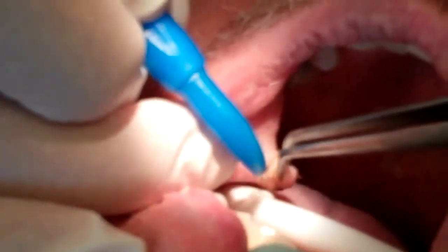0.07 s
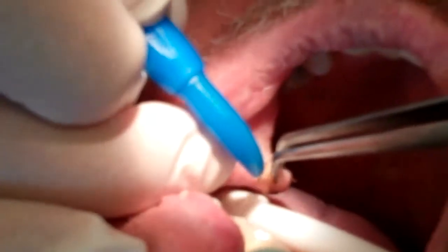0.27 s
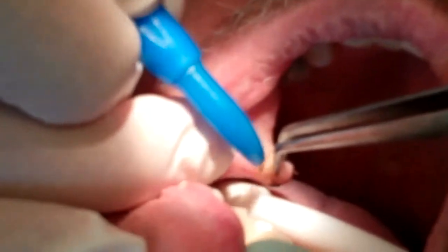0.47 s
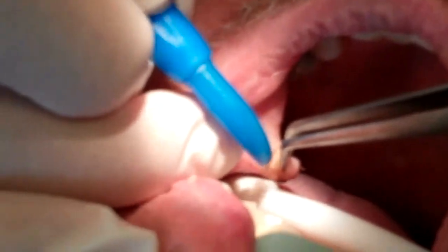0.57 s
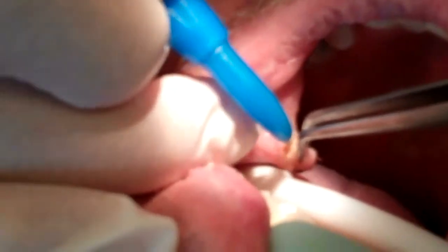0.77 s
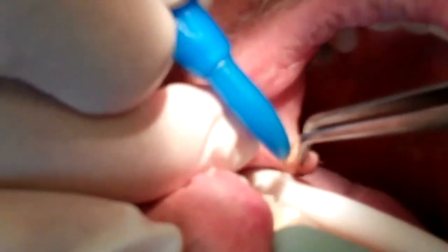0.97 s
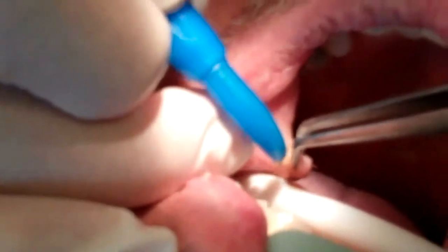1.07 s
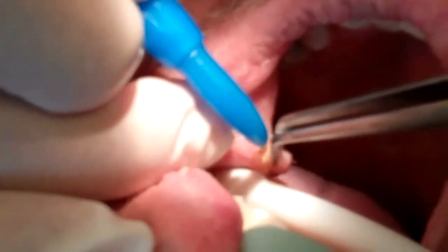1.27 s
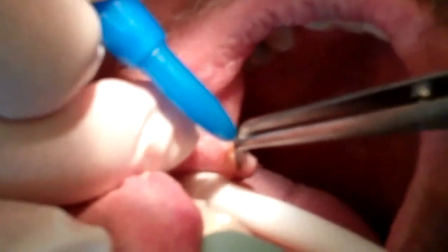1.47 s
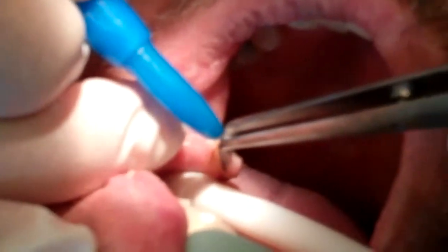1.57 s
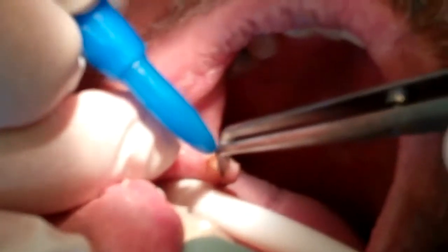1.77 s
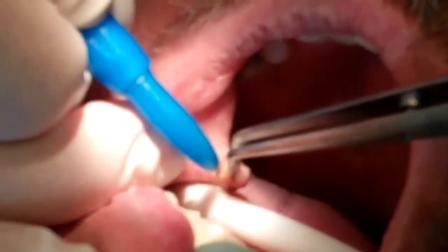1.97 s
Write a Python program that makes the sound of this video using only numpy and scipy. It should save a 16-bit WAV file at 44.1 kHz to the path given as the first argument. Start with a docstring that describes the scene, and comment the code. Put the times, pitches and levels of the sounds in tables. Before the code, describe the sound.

Dental suction hisses steadily for the full 2 seconds, close and bright, with resonant, tube-like high tones and only slight flutter. A thin airy whistle sags in pitch until 0.25 s, rises and stands out around 0.4-0.55 s, dips near 0.9 s, then fades after 1 s. Beneath, a very faint low hum wavers and swells unevenly over quiet treatment-room rumble.

```python
"""Dental suction in an open mouth

A suction tip draws air steadily, close to the microphone: stereo noise hisses through fixed
resonances of the tip and the mouth. One narrow, airy whistle, made of noise around a gliding pitch,
wanders as the tip shifts against the gum. Underneath, a faint low hum made of two sines wavers
in pitch and level, and filtered noise gives the quiet rumble of the treatment room."""
import sys
import numpy as np
from scipy.fft import rfft, irfft
from scipy.io import wavfile

SR = 44100
rng = np.random.default_rng(int(sys.argv[2]) if len(sys.argv) > 2 else 0)


def wav_record(signal):
    """Record a signal, one row per channel, as 16-bit PCM in the file named by sys.argv[1]."""
    frames = np.transpose(np.atleast_2d(signal))
    bounded = np.clip(frames, -1, 1)
    # unit amplitude maps onto the largest positive 16-bit level
    quanta = np.round(bounded * 32767).astype(np.int16)
    wavfile.write(sys.argv[1], SR, quanta)


N = 89126   # samples, about 2 s

# Strength of the air flow. Each row: time in seconds, hiss level in dB before the HISS_DB trim.
FLOW = [(0, -21), (.25, -21.5), (.38, -21.5), (.52, -20), (.68, -20.6), (1.15, -20.5), (1.4, -21),
        (1.6, -21), (1.86, -20.5), (2.02, -21.8)]
# Brightness of the hiss. Each row: time in seconds, gain in dB of the treble over the rest.
TREBLE_GAIN = [(0, 2.5), (.4, 2), (.65, 0.5), (1.15, 2.5), (1.45, 0.5), (1.7, 0.5), (2.02, 3)]
# Resonances of tip and mouth. Each row: center in Hz, half-power width in Hz, peak in dB per Hz
# before the flow level, left minus right in dB, left-right likeness from 0 to 1.
RESONANCES = [ (1068, 173, -43, -1, 0.94), (1186, 220, -41.5, -.4, 1), (3130, 190, -36.5, -0.5, 1),
              (3384, 190, -37, 6, 1), (3628, 215, -30, 0.9, 1), (4018, 230, -37.5, 0.5, 0.97),
              (5250, 340, -37, -3.5, 0.85), (5574, 244, -30.5, -2, 1), (6068, 361, -30.5, 1, 1),
              (6340, 134, -35.5, -8.5, 1), (7700, 158, -45, 6.5, 0.5), (8320, 230, -52.5, 4, 1),
              (9090, 177, -48.5, -4.7, 1), (9880, 544, -45.5, -7, 0.74), (10530, 170, -52.5, -15.5, 0.8),
              (11990, 305, -51, -4, 0.18), (13200, 410, -60, 3, 0), (14200, 200, -59, 2, 0.1)]
# Broad hiss of the jet between the resonances. Each row: frequency in Hz, dB per Hz before the flow level.
JET_SPECTRUM = [(250, -78), (450, -63.5), (720, -70), (1700, -55.5), (2400, -51.5), (3800, -56),
                (4700, -49.5), (7000, -62.5), (8300, -71.5), (11300, -65), (14000, -68)]
# Stereo likeness of the jet. Each row: frequency in Hz, left-right likeness from 0 to 1.
JET_LIKENESS = [(300, 0.8), (650, 0.4), (1400, .998), (2600, .998), (4000, .98), (7000, 0.96), (9000, .6),
                (11500, .1), (14000, 0)]
# Antiresonances of the tube. Each row: center in Hz, width in Hz, gain at the center in dB.
NOTCHES = [(1670, 105, -3), (4240, 100, -10.5), (6620, 140, -3.5), (10700, 300, -1.5)]
# The airy whistle at the tip. Each row: time in seconds, pitch in Hz, level in dB.
WHISTLE = [(0, 3120, -30), (.11, 2960, -32.5), (.25, 2860, -38), (.36, 2910, -36.5), (.43, 3130, -27.5),
           (.54, 3290, -28), (.59, 3048, -33.5), (.76, 3030, -30.5), (.83, 2830, -36.5), (.92, 2790, -36),
           (.97, 3096, -33), (1.05, 3100, -42.5), (2.02, 3090, -46.5)]
# Swells of the low hum. Each row: time in seconds, level in dB before the HUM_DB trim.
HUM_LEVEL = [(0, -61), (.1, -73), (.19, -54), (.26, -65), (.44, -51), (.58, -58), (.66, -61), (.86, -69),
             (.96, -58), (1.06, -74), (1.16, -60), (1.27, -74), (1.43, -79), (1.49, -60), (1.6, -77),
             (1.88, -60), (2.02, -67)]
# Room rumble. Each row: frequency in Hz, dB per Hz before the slow swells.
ROOM_SPECTRUM = [(20, -86.5), (45, -91), (70, -88), (110, -94.5), (165, -85), (205, -82), (270, -98),
                 (400, -95.5), (1000, -106)]

TREBLE_ABOVE_HZ = 8300
HISS_DB, FLUTTER_DB, FLUTTER_RATE_HZ = -0.5, 0.23, 39
WHISTLE_WIDTH_HZ = 130
HUM_HZ, HUM_WAVER_HZ = 185, 2.6
HUM_DB, HUM_FLICKER_DB, HUM_OCTAVE_DB = -1.5, 2.4, -15
ROOM_LIKENESS, ROOM_SWELL_DB, ROOM_SWELL_RATE_HZ = 0.65, 2, 10
CUTOFF_HZ = 14180

T = np.arange(N) / SR                                # seconds
HZ = np.maximum(np.arange(N // 2 + 1) * SR / N, 1)   # spectrum bins, kept off zero for the logs


def from_db(db):
    """Decibels to gain."""
    return 10 ** (np.asarray(db) / 20)


def in_time(rows):
    """Each column of a time curve, drawn out to every sample."""
    seconds, *columns = np.transpose(rows)
    return [np.interp(T, seconds, column) for column in columns]


def over_hz(rows):
    """A spectrum curve at every bin, joined by straight lines over log frequency."""
    hz, value = np.transpose(rows)
    return np.interp(np.log(HZ), np.log(hz), value)


def bell(hz, width_hz):
    """Gain of a resonance applied twice, for steep skirts, with the given half-power width."""
    detune = (HZ ** 2 - hz ** 2) / (HZ * width_hz)
    return 1 / (1 + (np.sqrt(2) - 1) * detune ** 2)


def drift(rate_hz):
    """Random wandering with spread 1: white noise lowpassed to half amplitude at rate_hz."""
    white = rfft(rng.standard_normal(N))
    slow = irfft(white / (1 + (HZ / rate_hz) ** 2), N)
    return slow / slow.std()


def turbulence(likeness):
    """Spectrum of stereo white noise at 0 dB per Hz; likeness mixes a shared and an opposed part."""
    mid, side = rfft(rng.standard_normal((2, N))) * np.sqrt(SR) / 2
    alike = np.clip(likeness, -1, 1)
    opposed = np.array([[1], [-1]])   # left, right
    return np.sqrt(1 + alike) * mid + np.sqrt(1 - alike) * side * opposed


def suction_hiss():
    """Rushing air excites the resonances; the level follows the flow and flutters a little."""
    air = from_db(over_hz(JET_SPECTRUM)) * turbulence(over_hz(JET_LIKENESS))
    for hz, width_hz, db, pan_db, likeness in RESONANCES:
        left_right_gain = from_db([[db + pan_db / 2], [db - pan_db / 2]])
        air = air + left_right_gain * bell(hz, width_hz) * turbulence(likeness)
    notch_db = sum(db * bell(hz, width_hz) for hz, width_hz, db in NOTCHES)
    air = air * from_db(notch_db)

    # Split off the treble so its brightness can move on its own.
    treble_share = 1 / (1 + (TREBLE_ABOVE_HZ / HZ) ** 12)
    body = irfft(air * (1 - treble_share), N)
    treble = irfft(air * treble_share, N)
    (flow_db,), (treble_db,) = in_time(FLOW), in_time(TREBLE_GAIN)
    level_db = HISS_DB + flow_db + FLUTTER_DB * drift(FLUTTER_RATE_HZ)
    return from_db(level_db) * (body + from_db(treble_db) * treble)


def tip_whistle():
    """A narrow band of noise that glides in pitch as the gap at the tip changes."""
    pitch_hz, level_db = in_time(WHISTLE)
    phase = 2 * np.pi * np.cumsum(pitch_hz) / SR
    # Two independent drifts on cosine and sine spread the tone into a band around its pitch.
    cosine_part = drift(WHISTLE_WIDTH_HZ / 2) * np.cos(phase)
    sine_part = drift(WHISTLE_WIDTH_HZ / 2) * np.sin(phase)
    return from_db(level_db) * (cosine_part + sine_part)


def low_hum():
    """A faint sine with a weak octave, wavering in pitch and level."""
    swell_db, = in_time(HUM_LEVEL)
    pitch_hz = HUM_HZ + HUM_WAVER_HZ * drift(16)
    phase = 2 * np.pi * np.cumsum(pitch_hz) / SR
    level = from_db(HUM_DB + swell_db + HUM_FLICKER_DB * drift(19))
    tone = np.sin(phase) + from_db(HUM_OCTAVE_DB) * np.sin(2 * phase)
    return level * np.sqrt(2) * tone   # root 2 brings a sine to an RMS of 1


def room_rumble():
    """The quiet, uneven floor of the treatment room: filtered noise that swells at random."""
    rumble = irfft(from_db(over_hz(ROOM_SPECTRUM)) * turbulence(ROOM_LIKENESS), N)
    return from_db(ROOM_SWELL_DB * drift(ROOM_SWELL_RATE_HZ)) * rumble


def scene():
    """Suction in front, hum and room behind; whistle and hum sit in the center."""
    return suction_hiss() + tip_whistle() + low_hum() + room_rumble()


def record(dry):
    """The very top is cut steeply, almost like a wall."""
    steep_cut = 1 / np.sqrt(1 + (HZ / CUTOFF_HZ) ** 800)
    return irfft(rfft(dry) * steep_cut, N)


dry = scene()
out = record(dry)
wav_record(out)
```